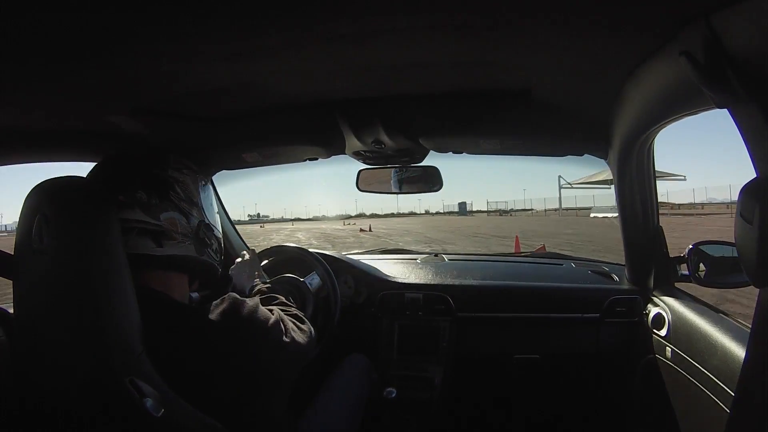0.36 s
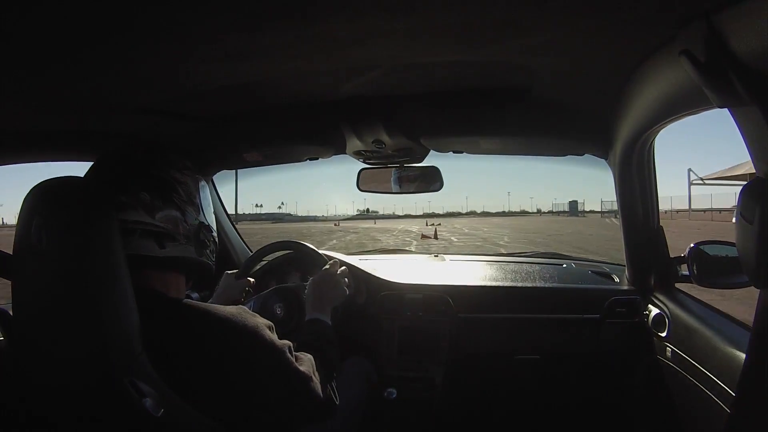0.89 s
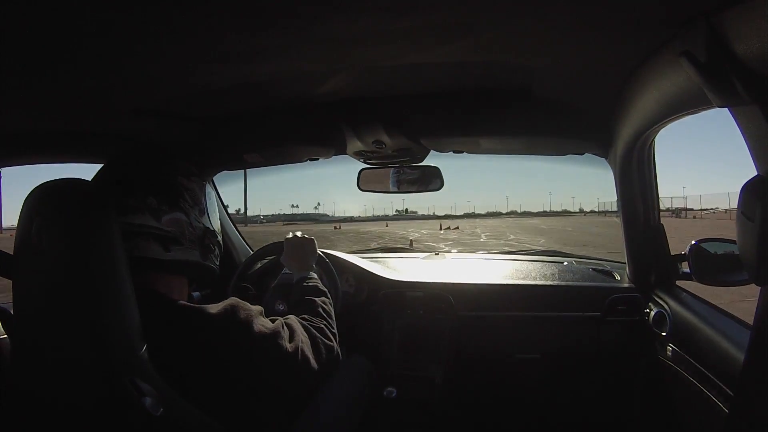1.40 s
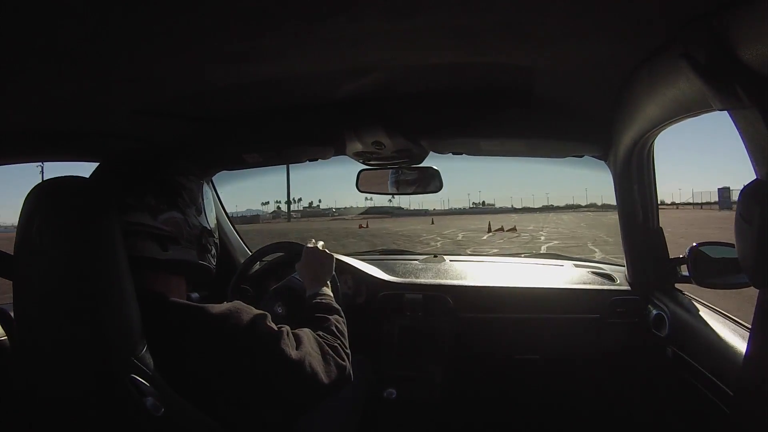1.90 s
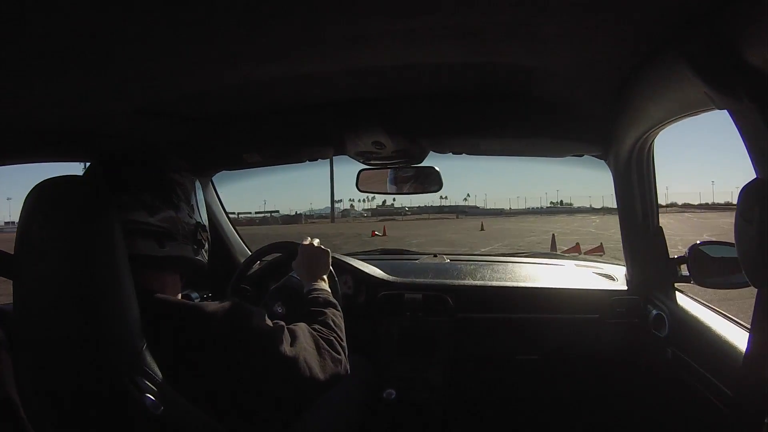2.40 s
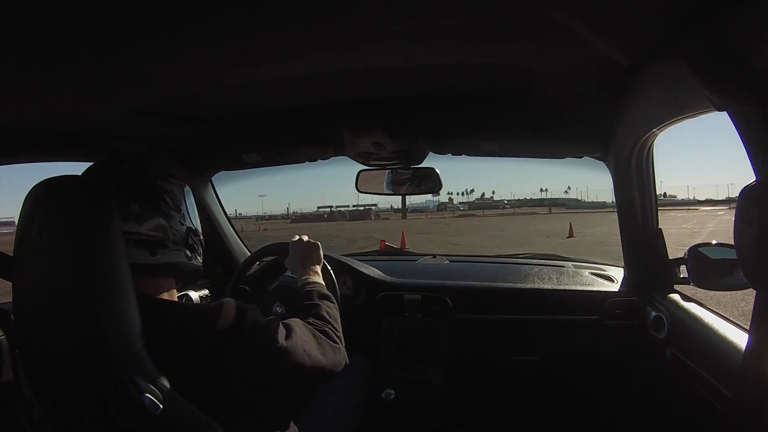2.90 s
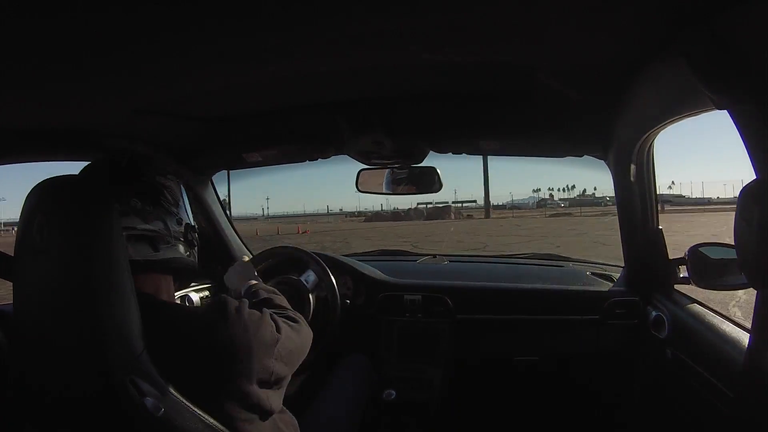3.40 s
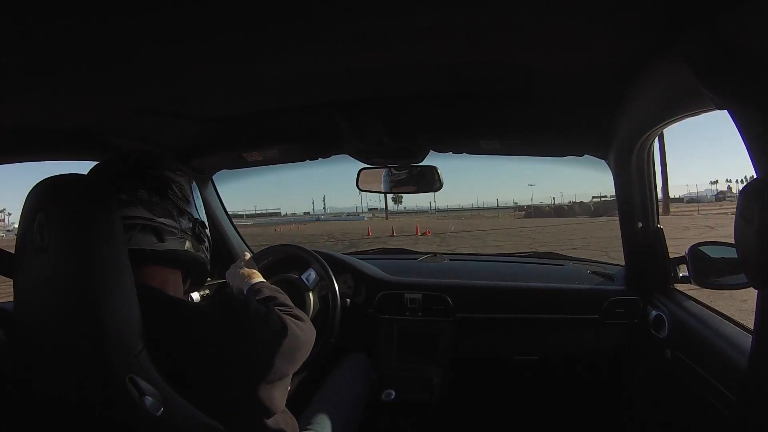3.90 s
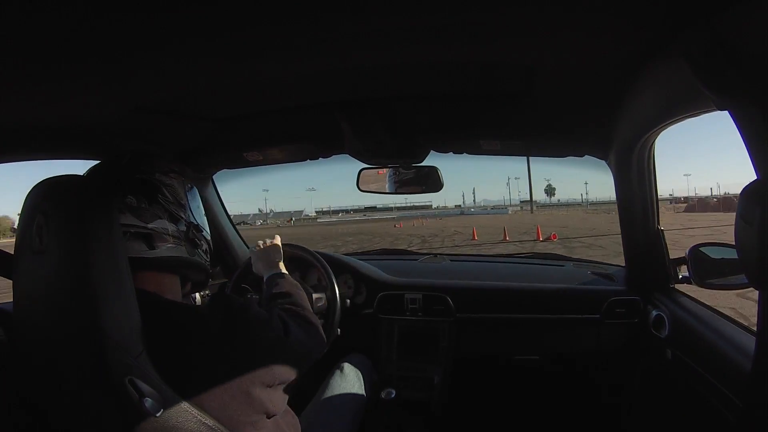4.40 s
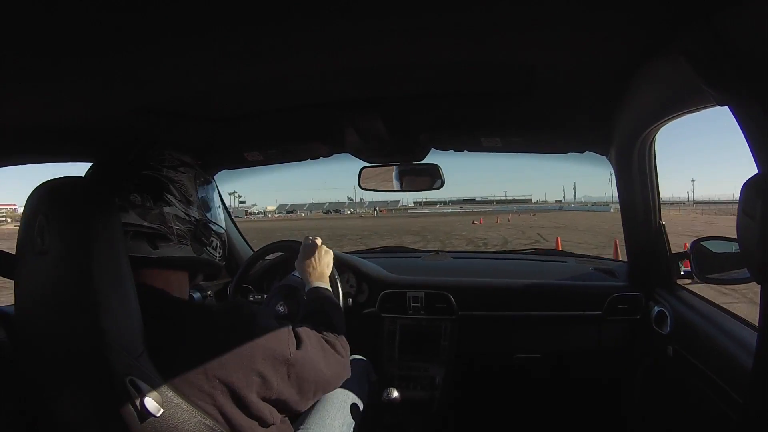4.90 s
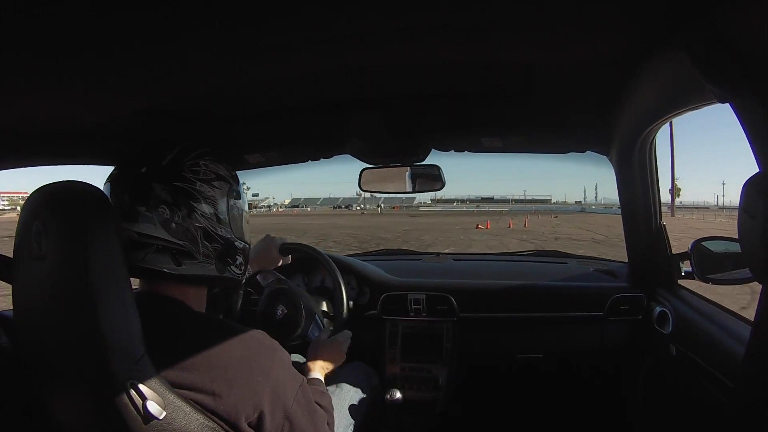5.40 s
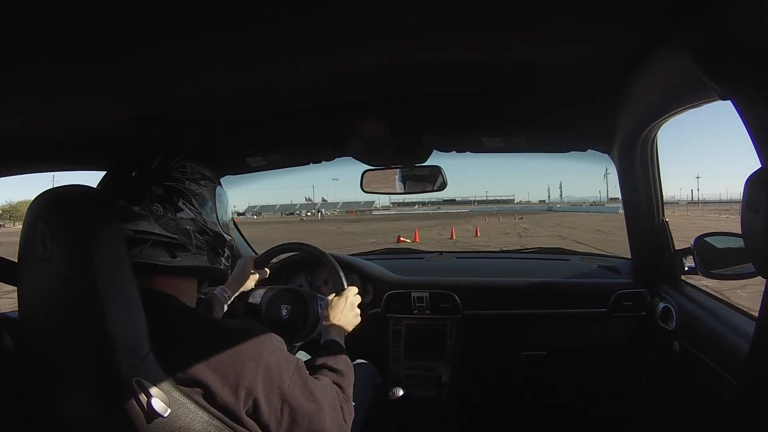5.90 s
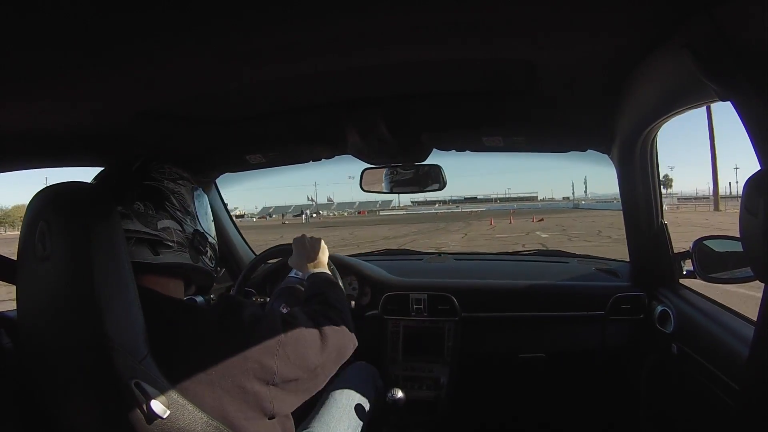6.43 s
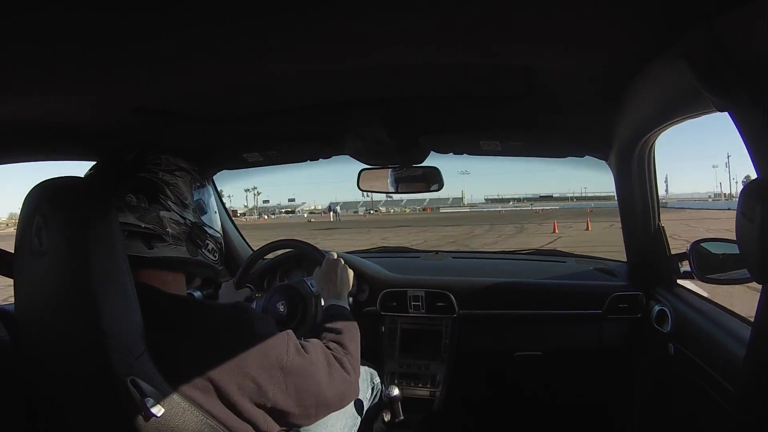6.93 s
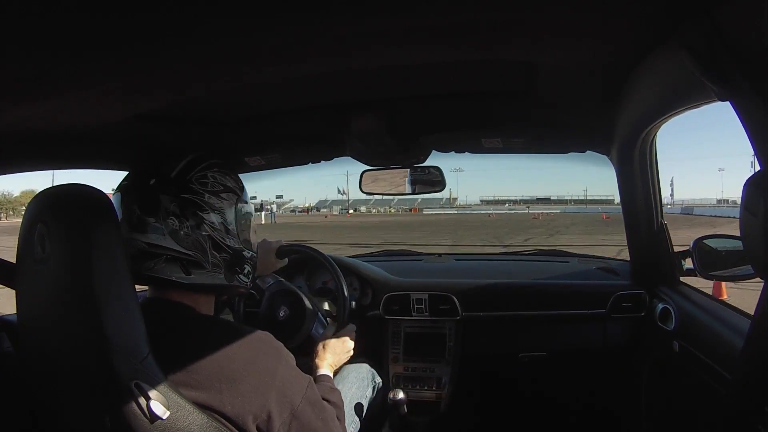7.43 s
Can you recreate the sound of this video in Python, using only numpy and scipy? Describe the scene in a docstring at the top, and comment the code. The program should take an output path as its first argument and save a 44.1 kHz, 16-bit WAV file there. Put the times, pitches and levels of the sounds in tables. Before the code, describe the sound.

Inside a car cabin, a loud unmuffled engine pulls, eases off, then climbs hard again amid wind buffeting, road roar and a brief tyre moan.

```python
"""Inside a car cabin with the windows down: a flat six with an open exhaust pulls, coasts and pulls again.
Exhaust and crank tones follow one firing rate; shaped noise makes wind buffeting, road roar and hiss.
A low window throb wavers beneath, the tyres moan briefly in the turn, and a small hard part rattles twice.
Ticks are tiny steps, the level dips now and then, and a limiter buzzes faintly on the tallest peaks."""
import sys
import numpy as np
from scipy import signal
from scipy.io import wavfile
from scipy.ndimage import uniform_filter1d

SR = 44100
rng = np.random.default_rng(int(sys.argv[2]) if len(sys.argv) > 2 else 0)


def voltage_ratio(level):
    """Linear amplitude factor for a level in decibels (scalar or array-like)."""
    return 10 ** (np.asarray(level, float) / 20)


def int16_out(signal):
    """Quantize to a 16-bit WAV file."""
    q = np.round(np.clip(np.atleast_2d(signal).T, -1, 1) * 32767)
    wavfile.write(sys.argv[1], SR, q.astype(np.int16))


N = 332955  # samples, about 7.55 s

# How hard the engine pulls. Each row: time in seconds, load in dB (0 is full load).
ENGINE_LOAD = [(0.0, -7.1), (0.15, -4.0), (0.45, -3.7), (1.2, 1.0), (1.45, -1.7), (1.8, -6.1), (2.1, -10.6),
               (2.5, -8.1), (3.4, -12.5), (3.75, -19.2), (4.05, -6.7), (4.5, -3.8), (5.0, -2.4),
               (5.4, -0.5), (5.7, -4.8), (6.1, 0.1), (6.45, -1.4), (6.6, -2.3), (7.0, -3.3), (7.25, 0.7),
               (7.55, -4.5)]
# Gusts at the open windows. Each row: time in seconds, side wind in dB.
SIDE_WIND = [(0, -16), (.42, -16.5), (.6, -23.5), (1.3, -22.5), (1.4, -20), (1.78, -21.5), (1.85, -16),
             (2.25, -13), (2.55, -17), (2.9, -14), (3.87, -13.5), (4.67, -22.5), (5.2, -20), (6.29, -16),
             (7.34, -23), (7.55, -16.5)]


def evened(x):
    """Scales a signal to rms 1."""
    return x / np.sqrt(np.mean(x ** 2) + 1e-20)


def curves(rows):
    """Draws straight lines between table rows: each column after the time, at every sample."""
    seconds, *columns = np.transpose(rows)
    return [np.interp(np.arange(N) / SR, seconds, column) for column in columns]


def noise(spectrum, patchy_db, flicker_db, size=1024):
    """Noise of rms 1 from random short-time spectra, with drifting patches and a flicker shared by all pitches."""
    frames, bin_hz = 4 * N // size + 9, np.fft.rfftfreq(size, 1 / SR)
    real, imaginary, patches = rng.standard_normal((frames, len(bin_hz), 3)).T
    patches = uniform_filter1d(patches, size=8, axis=0)  # across pitch
    patches = evened(uniform_filter1d(patches, size=8, axis=1))  # across time
    hz, db = np.transpose(spectrum)
    shape_db = np.interp(np.log(bin_hz + 1), np.log(hz + 1), db, left=-90, right=-90)[:, None]
    flicker = rng.standard_normal(frames)
    spectra = (real + 1j * imaginary) * voltage_ratio(shape_db + patchy_db * patches + flicker_db * flicker)
    sound = signal.istft(spectra, nperseg=size, noverlap=3 * size // 4)[1]
    return evened(sound[size:][:N])


def slow(rate_hz):
    """Smooth random drift of rms 1: white noise low-passed at the given rate."""
    white = rng.standard_normal(N + SR)
    lowpass = signal.butter(3, rate_hz, fs=SR, output="sos")
    return evened(signal.sosfilt(lowpass, white)[SR:])  # the first second settles the filter


def wavering(hz, wander_hz, rate_hz):
    """A tone of rms 1 whose pitch wanders at random by wander_hz rms."""
    turns = np.cumsum(hz + wander_hz * slow(rate_hz)) / SR
    return np.sqrt(2) * np.sin(2 * np.pi * turns)


def wind_rumble():
    """Wind buffeting in lumps: low noise that rises and falls with the side wind."""
    # Each row: pitch in Hz, relative level in dB per Hz.
    rumble_spectrum = [(20, -13.5), (45, 2), (90, 2), (140, -4.5), (220, -13.5), (400, -25.5)]
    (wind_db,) = curves(SIDE_WIND)
    return noise(rumble_spectrum, patchy_db=-1.5, flicker_db=2.0, size=4096) * voltage_ratio(wind_db)


def road_noise(firing_hz):
    """Road and body roar and hiss, and a wind fizz: noise that follows speed, side wind and load."""
    # Levels at the cruising rate in calm wind and at full load. Each row: level in dB,
    # dB an octave of speed, dB for each dB of side wind, dB for each dB of load.
    roar_law = (-27.5, 1.5, 0.46, 0.48)
    hiss_law = (-51.5, 8, .35, 0.25)
    # Spectra of the three noises. Each row: pitch in Hz, relative level in dB per Hz.
    roar_spectrum = [(100, 0), (200, 6), (400, 0.5), (600, 2.5), (800, -1.5), (1050, -11), (1300, -33)]
    hiss_spectrum = [(710, -34), (1200, -3), (1400, -2.5), (2050, -7.5), (2400, -6), (2700, -6.5),
                     (3100, -12.5), (3700, -10.5), (4100, -14), (4600, -18), (6200, -21), (8000, -31),
                     (11000, -48), (13000, -66)]
    fizz_spectrum = [(5000, -4.5), (8000, -1.5), (11000, -3.5)]
    cruise_hz, calm_db = 200, -20  # firing rate, side wind
    (wind_db,), (load_db,) = curves(SIDE_WIND), curves(ENGINE_LOAD)
    octaves = np.log2(firing_hz / cruise_hz)
    roar_db, hiss_db = [db + per_octave_db * octaves + windy * (wind_db - calm_db) + loaded * load_db
                        for db, per_octave_db, windy, loaded in (roar_law, hiss_law)]
    shake = slow(65)  # bumps shake roar and hiss together
    roar = noise(roar_spectrum, patchy_db=.5, flicker_db=.5) * voltage_ratio(roar_db + 1.1 * shake)
    hiss = noise(hiss_spectrum, patchy_db=1.0, flicker_db=0.63, size=512) * voltage_ratio(hiss_db + 1.4 * shake)
    fizz = noise(fizz_spectrum, patchy_db=2.5, flicker_db=3.5, size=512)
    return roar + hiss + fizz * voltage_ratio(2.1 * hiss_db + 31.5)  # fizz grows faster than hiss


def throb():
    """The cabin throbs like a blown bottle: one low tone, wavering in pitch and level."""
    # Each row: time in seconds, window throb in dB.
    throb_level = [(0.0, -16), (0.29, -25.5), (0.48, -14), (1.24, -28), (1.3, -12), (1.58, -24),
                   (2.33, -11), (2.46, -25.5), (3.24, -13), (3.53, -23), (3.64, -12), (4.14, -20),
                   (4.25, -31.5), (4.31, -14.5), (4.75, -16), (7.28, -12.5), (7.36, -25.5), (7.55, -11)]
    return wavering(30.5, wander_hz=4.35, rate_hz=8) * voltage_ratio(curves(throb_level)[0] + 2.2 * slow(8.7))


def tyres():
    """Tread blocks slip and catch in broken cries: a wavering moan and fainter ones above, in a wide scrub."""
    # Each row is one cry: middle in seconds, length in seconds, pitch in Hz, level in dB.
    cry_rows = [(2.885, 0.16, 698, -33.5), (3.034, 0.11, 698.4, -37.5), (3.482, 0.075, 675, -31.5),
                (3.652, 0.35, 692, -30.5), (3.808, 0.13, 660, -29.5), (3.923, 0.16, 660, -31.5),
                (4.017, .2, 687.6, -30), (4.166, .12, 658, -33), (4.27, 0.19, 690, -36)]
    # Each row: pitch in Hz, relative level in dB per Hz.
    scrub_spectrum = [(500, -9), (750, 1.5), (1100, -8.5), (1500, -16), (2500, -24), (4000, -30.5)]
    scrub_db = -7.5  # on the smoothed cries
    t, (middles, _, pitches, _) = np.arange(N) / SR, np.transpose(cry_rows)
    hz = np.interp(t, middles, pitches)
    # each cry swells and fades as half a cosine
    cries = sum(voltage_ratio(db) * np.cos(np.pi * np.clip((t - middle) / length, -.5, .5))
                for middle, length, _, db in cry_rows)
    moan = wavering(hz, 20, 20) * voltage_ratio(3.5 * slow(14))
    above = .45 * wavering(1.15 * hz, 30, 28) * voltage_ratio(4.5 * slow(12))
    growl = 0.11 * wavering(1.6 * hz, 70, 60)
    scrub = noise(scrub_spectrum, patchy_db=4.5, flicker_db=2.5, size=512) * voltage_ratio(scrub_db)
    return cries * (moan + above + growl) + scrub * uniform_filter1d(cries, size=9000)


def ticks():
    """Each dry tick is two to seven tiny uneven steps within 4 ms; small single ones fall at random."""
    # Each row: start in seconds, largest step in dB before smoothing.
    tick_rows = [(0.1175, -38), (.221, -41), (0.411, -36), (0.4389, -34), (0.47, -32), (0.5387, -34),
                 (0.605, -40), (.621, -39.5), (0.7109, -31.5), (.744, -38.5), (0.895, -37), (.979, -41),
                 (2.221, -33.5), (2.176, -38.5), (2.272, -37), (2.458, -41), (2.867, -37), (3.1741, -35),
                 (3.48, -36), (3.916, -40.5), (4.0946, -35.5), (4.3137, -32.5), (4.347, -42.5),
                 (4.45, -37.5), (4.56, -34.5), (4.765, -37), (4.779, -34), (4.922, -37), (5.032, -39),
                 (5.137, -34), (5.187, -38), (5.42, -33.5), (5.4321, -30), (5.634, -37.5), (5.976, -29.5),
                 (5.9915, -34.5), (6.043, -31.5), (6.2126, -32), (6.2821, -37.5), (6.4143, -38),
                 (6.4296, -35.5), (6.4937, -34.5), (6.94, -34.5), (7.095, -37)]
    small_per_s, small_db = 30, -52.5  # mean rate, level of the faintest before smoothing
    falls = rng.random(N) < small_per_s / SR
    steps = falls * voltage_ratio(small_db + 3.7 * rng.exponential(1, N))
    for (start, db), draw in zip(tick_rows, rng.random((len(tick_rows), 15))):
        count = 2 + int(6 * draw[0])
        at = round(start * SR) + np.cumsum(13 + 16 * draw[1:8]).astype(int)
        steps[at[:count]] += voltage_ratio(db) * (.5 + .5 * draw[8:][:count])
    t = np.arange(-40, 41)  # samples
    jump = np.sign(t) * np.exp(-abs(t) / 10.0)  # a step with its bass lost under the engine
    return signal.oaconvolve(steps, uniform_filter1d(jump, size=2), "same")


def rattles():
    """A small hard part rattles: a short burst of noise rings its modes."""
    # Each row is one mode: pitch in Hz, relative level in dB, time to fall 60 dB in seconds.
    modes = [(6240, 0, 0.008), (5300, -1, 0.008), (10300, -4, 0.007)]
    # Each row: start in seconds, peak in dB.
    blow_rows = [(0.342, -46.5), (.382, -33.5)]
    out, t = np.zeros(N), np.arange(1500) / SR
    ring = sum(voltage_ratio(db - 60 * t / t60) * np.sin(2 * np.pi * hz * t) for hz, db, t60 in modes)
    for start, db in blow_rows:
        burst = rng.standard_normal(200) * np.exp(-np.arange(200) / 60)
        blow = np.convolve(ring, burst)[:1500]
        out[round(start * SR):][:1500] += voltage_ratio(db) * blow / abs(blow).max()
    return out


def dips():
    """Gain that drops within 3 ms and climbs back at a steady rate in dB; overlapping depths add up."""
    # Each row: time in seconds, depth in dB.
    dip_rows = [(0.414, 3), (0.471, 2.5), (0.715, 3), (4.562, 5.5), (4.608, 4.5), (4.782, 6.5), (4.931, 4),
                (5.178, 5.5), (5.425, 1.5), (5.431, 8.5), (5.977, 5), (6.046, 7.5), (6.435, 8.5), (6.5, 5),
                (6.97, 5.5)]
    recovery_db_per_s = 51
    drops = np.zeros(N)
    for s, db in dip_rows:
        drops[round(s * SR)] = db
    total_db = np.cumsum(uniform_filter1d(drops, size=130) - recovery_db_per_s / SR)
    return voltage_ratio(np.minimum.accumulate(total_db) - total_db)  # height over the lowest point so far


def firing_rate():
    """The driveline winds up and springs back: the speed curve takes a damped swing after each jolt."""
    # Each row: time in seconds, firing rate in Hz.
    speed = [(0.0, 173.2), (0.52, 188.3), (1.16, 209.8), (1.36, 224.3), (1.74, 223.7), (2.0, 219.4),
             (2.23, 219.9), (2.54, 212.1), (2.78, 195.8), (3.03, 184.9), (3.41, 174.4), (4.1, 169.1),
             (4.9, 195.8), (5.3, 215.7), (6.0, 251.2), (6.36, 268.9), (6.91, 300.7), (7.3, 313.9),
             (7.4, 300.7), (7.55, 296.9)]
    # Each row: time in seconds, size of the swing in Hz before damping.
    jolts = [(0.508, 6.9), (4.233, 4.0), (4.501, 7.0), (4.65, 12.2), (4.838, 8.7), (5.022, 10.9),
             (5.368, 2.1), (5.461, 5.5), (5.693, 12.1), (6.039, 5.2), (6.231, 3.6), (6.574, 7.0),
             (6.883, 7.6)]
    swing_hz, decay_s = 4.25, .2
    t, (hz,) = np.arange(N) / SR, curves(speed)
    for s, size_hz in jolts:
        after = np.maximum(t - s, 0)
        hz = hz + size_hz * np.sin(2 * np.pi * swing_hz * after) * np.exp(-after / decay_s)
    return hz


def engine(hz, rough=0.03):
    """Each bank fires at half the rate, so tones sit on half steps; uneven burns roughen them."""
    # Main exhaust tones. Each row: multiple of the firing rate, dB at full load before the cabin,
    # dB lost for each dB of load.
    tones = [(1, 0, 1), (1.5, 1.4, 1.2), (2, 2.0, 2.7), (2.5, 2.2, 1.9), (2.667, -17, 0)]
    # Higher tones of one cylinder bank. Each row: multiple of the firing rate, dB at full load before the fade.
    upper_tones = [(3, -34.5), (3.5, -34), (4, -38)]
    # Tones of the crank turns. Each row: crank order (firing is order 3), dB near top speed, dB at lower speeds.
    crank_tones = [(2, -29.5, -39.5), (3.5, -36, -43.5), (4, -42, -43.5), (5, -24.5, -50.5),
                   (7.5, -40.5, -60)]
    # Exhaust and cabin lift or swallow a tone by its pitch. Each row: pitch in Hz, gain in dB.
    cabin = [(170.0, -8.3), (208.0, -15.8), (224.0, -22.1), (243.0, -18.8), (262.0, -28.4), (278.0, -19.2),
             (295.0, -22.5), (312.0, -33.0), (335.0, -16.8), (365.0, -17.0), (387.0, -27.4), (412.0, -25.9),
             (447.0, -38.9), (480.0, -26.6), (505.0, -22.6), (530.0, -29.3), (558.0, -35.1), (590.0, -24.5),
             (625.0, -29.7), (680.0, -31.8), (720.0, -39.1), (780.0, -33.2), (850.0, -48.0),
             (1100.0, -48.0)]
    upper_loss = 1.3  # dB lost for each dB of load
    fade_hz, fade_db = 750, -31.5  # the cabin dulls upper tones above this pitch, dB an octave
    crank_from_hz, crank_full_hz = 280, 304.7  # firing rates between which the crank levels cross over
    (load_db,), (cabin_hz, cabin_db) = curves(ENGINE_LOAD), np.transpose(cabin)
    gains = []  # (multiple of the firing rate, gain)
    for k, db, loss in tones:
        lift_db = np.interp(np.log(k * hz), np.log(cabin_hz), cabin_db)
        gains.append((k, voltage_ratio(db + loss * load_db + lift_db)))
    for k, db in upper_tones:
        octaves_over = np.maximum(np.log2(k * hz / fade_hz), 0)
        gains.append((k, voltage_ratio(db + upper_loss * load_db + fade_db * octaves_over)))
    top = np.clip((hz - crank_from_hz) / (crank_full_hz - crank_from_hz), 0, 1)
    for order, db, low_db in crank_tones:
        gains.append((order / 3, voltage_ratio(top * db + (1 - top) * low_db)))
    turns = np.cumsum(hz * (1 + 0.003 * slow(25))) / SR  # firing cycles, slightly unsteady
    out = np.zeros(N)
    for k, gain in gains:
        unevenness = (1 + rough * slow(40)) * voltage_ratio(.9 * slow(6.6))
        out += np.sqrt(2) * gain * unevenness * np.sin(2 * np.pi * (k * turns + rng.random()))
    return out


def scene():
    """All sources at the one microphone; the throb sinks less in the dips, ticks and rattles not at all."""
    hz, level = firing_rate(), dips()
    dipped = wind_rumble() + road_noise(hz) + tyres() + engine(hz)
    throb_share = 0.29  # share of each dip, in dB, that the throb follows
    return (level ** throb_share * throb() + level * dipped + ticks() + rattles())[None]


def band_limit(x):
    """A steep low-pass at the top of the band."""
    return signal.sosfilt(signal.butter(12, 15710, fs=SR, output="sos"), x)


def record(dry, knee=.6, slope=.31, stepped=.03):
    """A limiter squeezes peaks over the knee; a small share of its gain moves in 20-sample steps and buzzes."""
    squeeze = (1 - slope) * np.maximum(1 - knee / (abs(dry) + 1e-9), 0)
    smooth = uniform_filter1d(squeeze, size=40)
    held = np.repeat(smooth[:, ::20], 20, axis=1)[:, :N]
    limited = dry * (1 - (1 - stepped) * smooth - stepped * held)
    return band_limit(limited)


dry = scene()
out = record(dry)
int16_out(out)
```